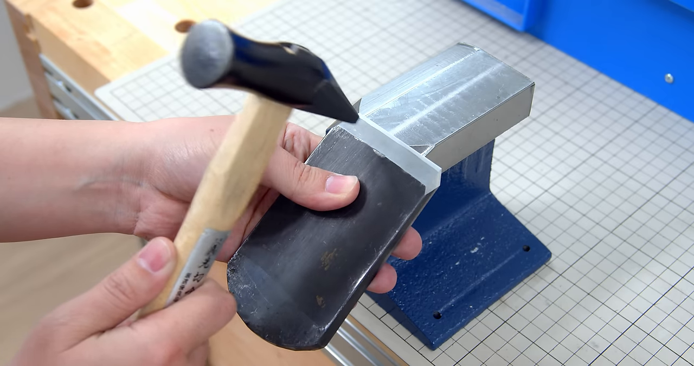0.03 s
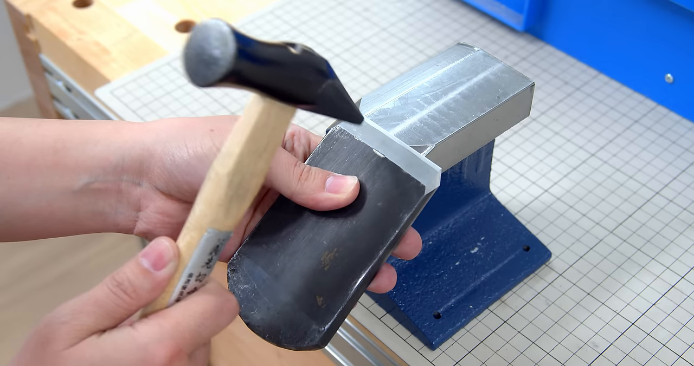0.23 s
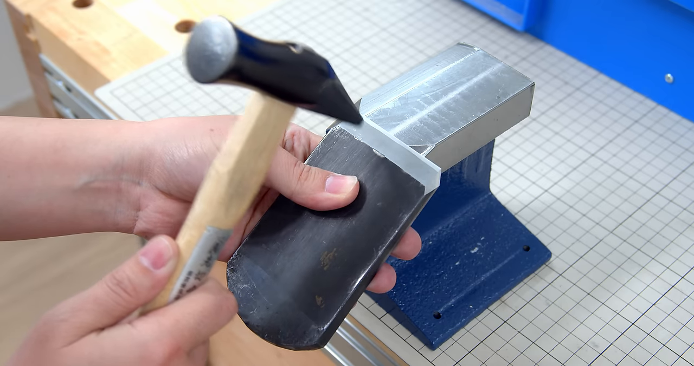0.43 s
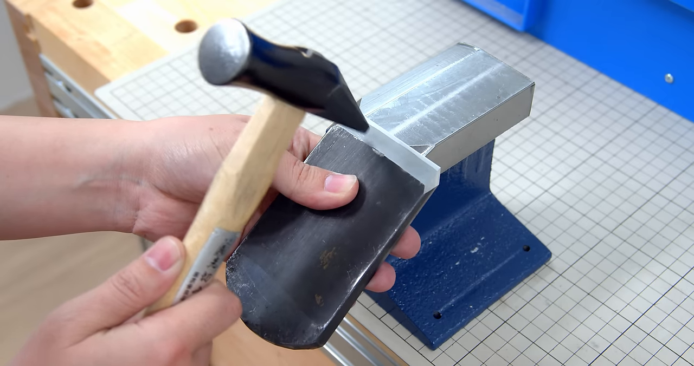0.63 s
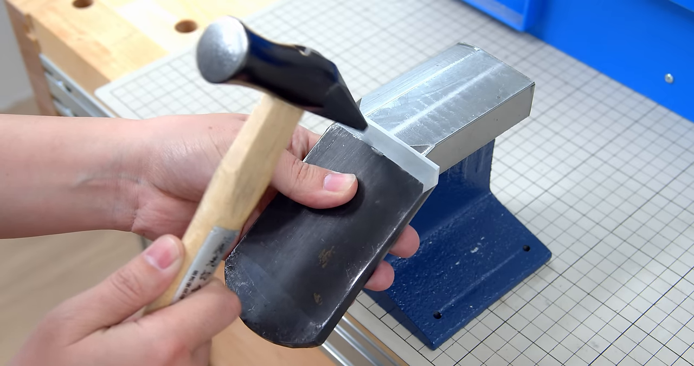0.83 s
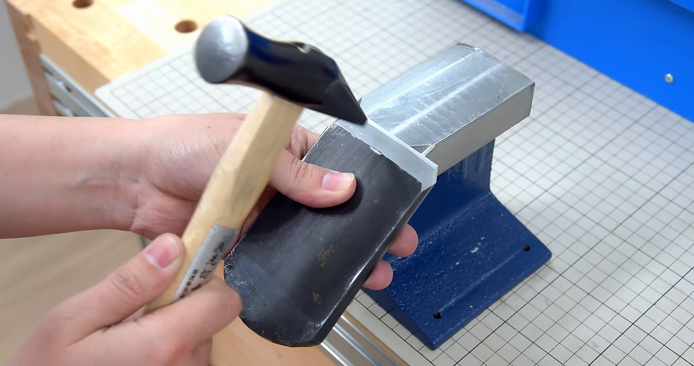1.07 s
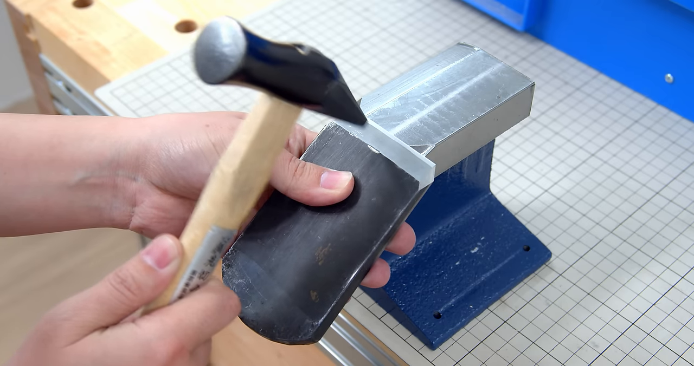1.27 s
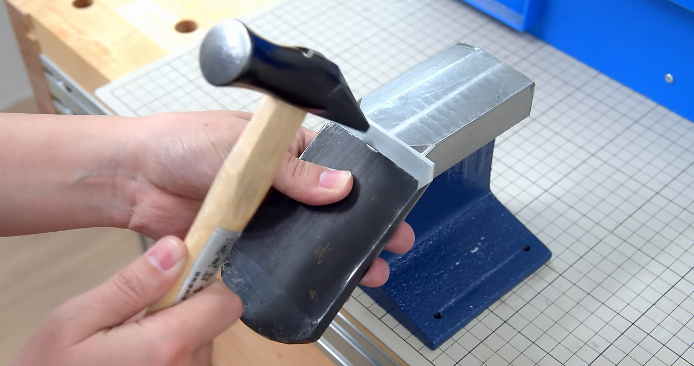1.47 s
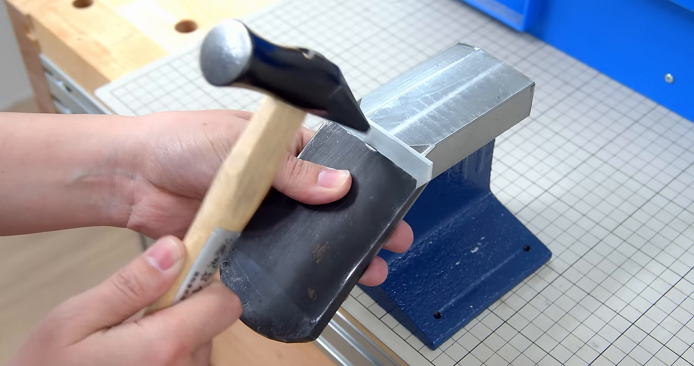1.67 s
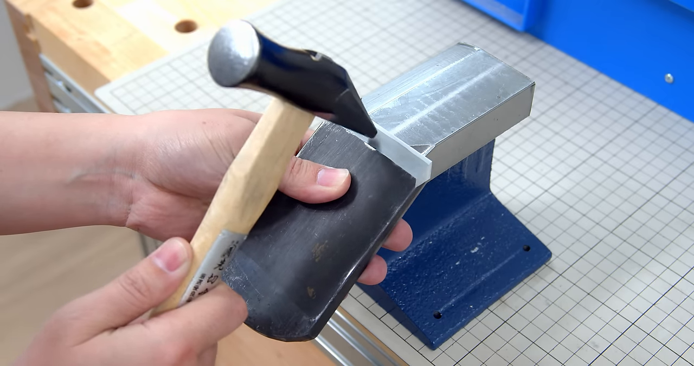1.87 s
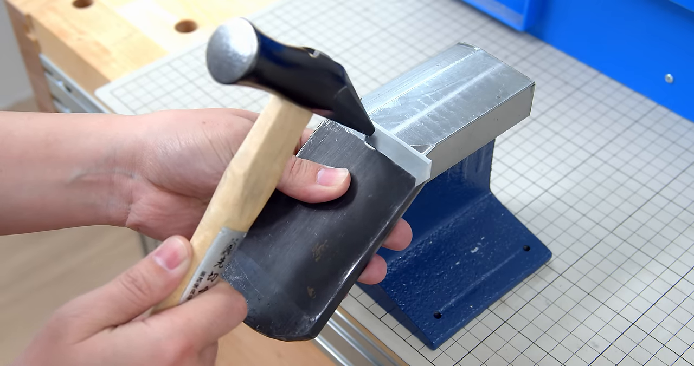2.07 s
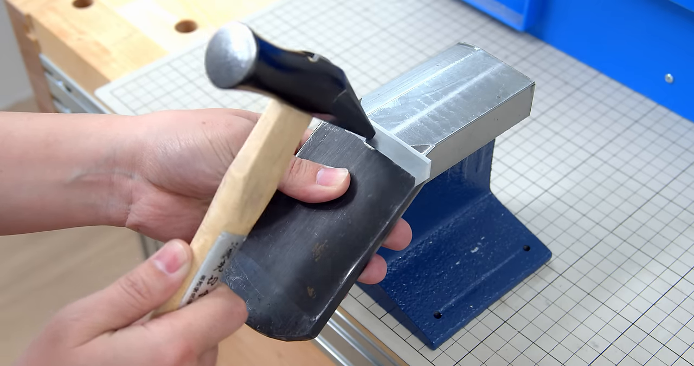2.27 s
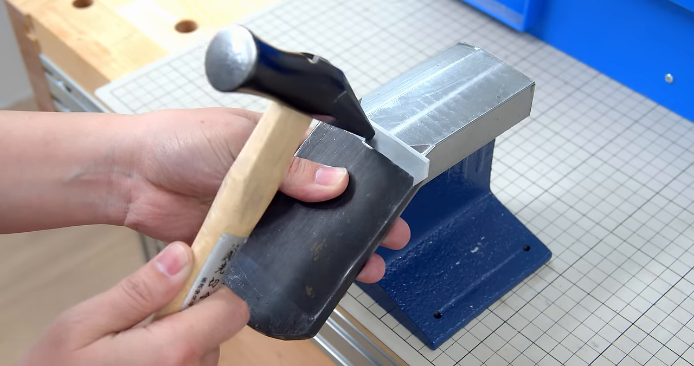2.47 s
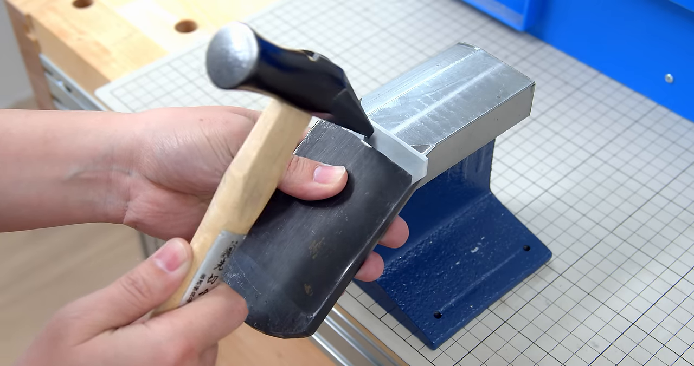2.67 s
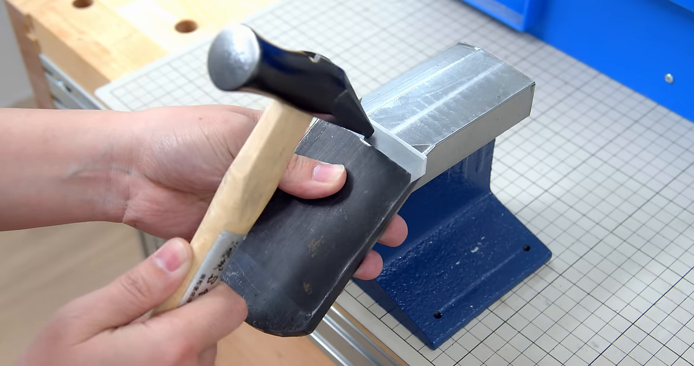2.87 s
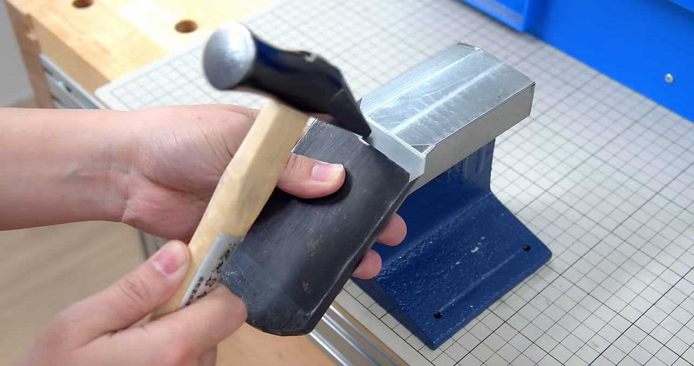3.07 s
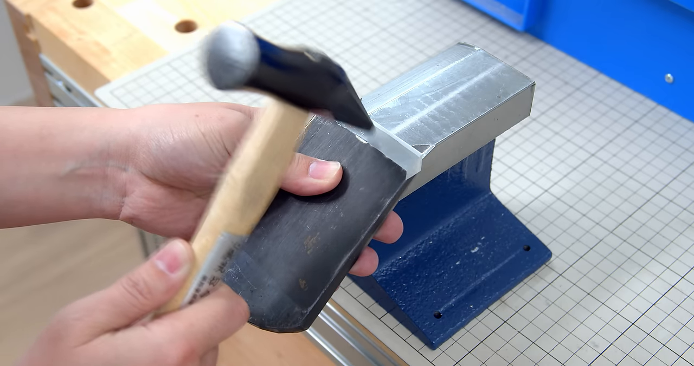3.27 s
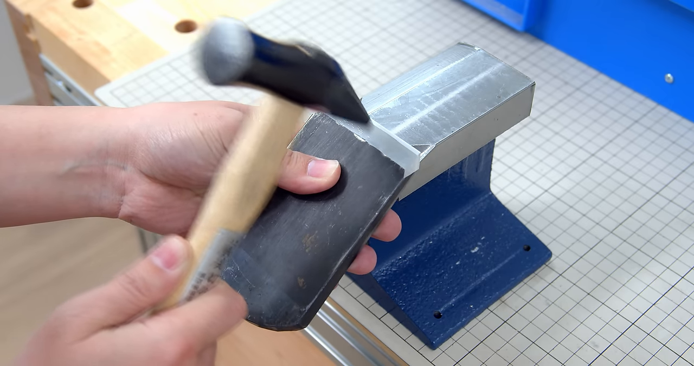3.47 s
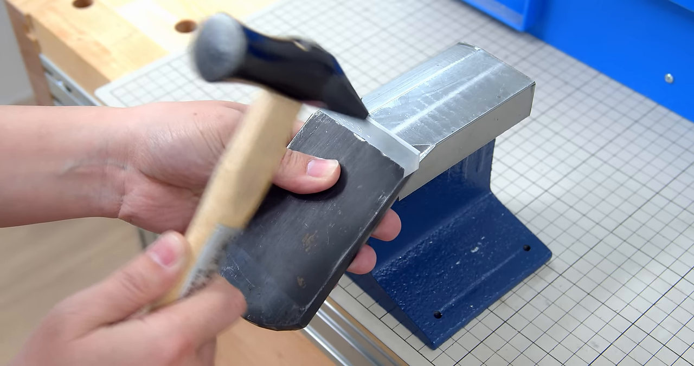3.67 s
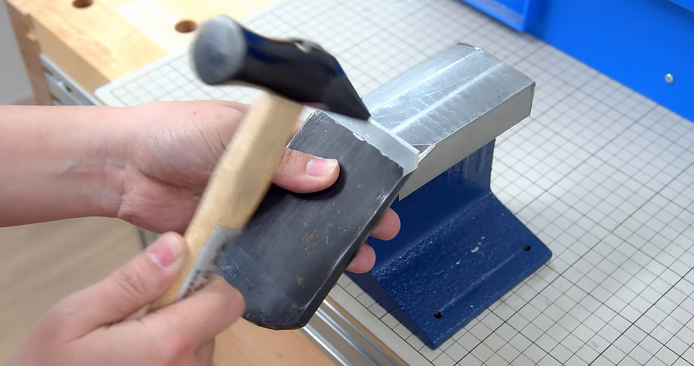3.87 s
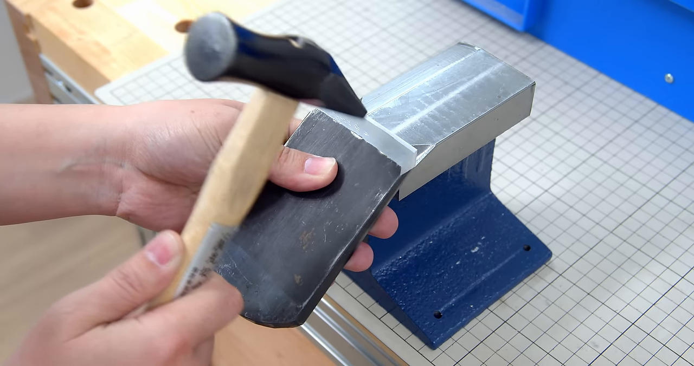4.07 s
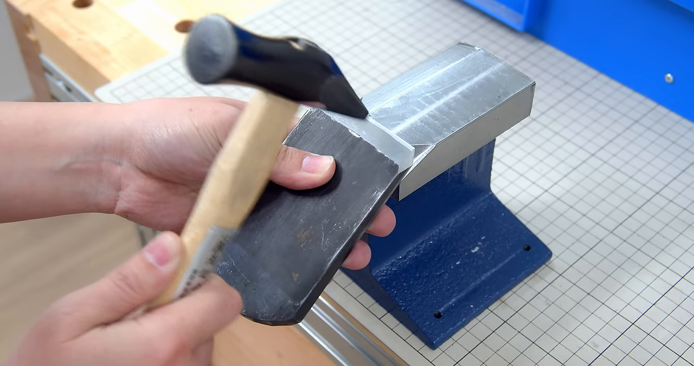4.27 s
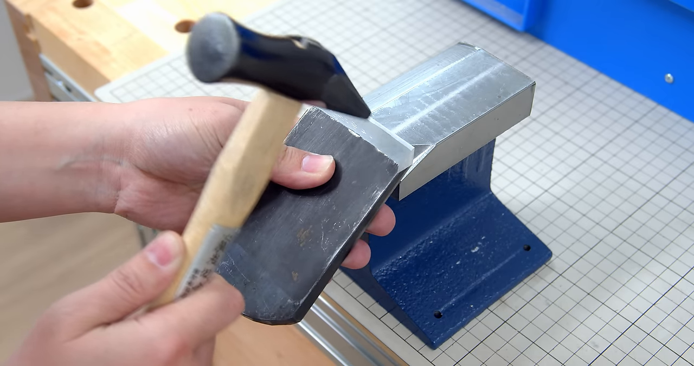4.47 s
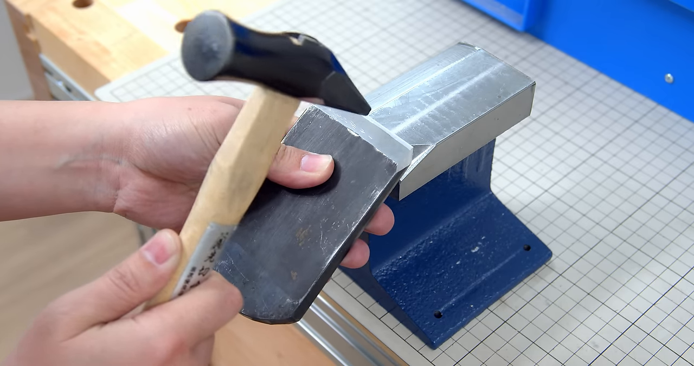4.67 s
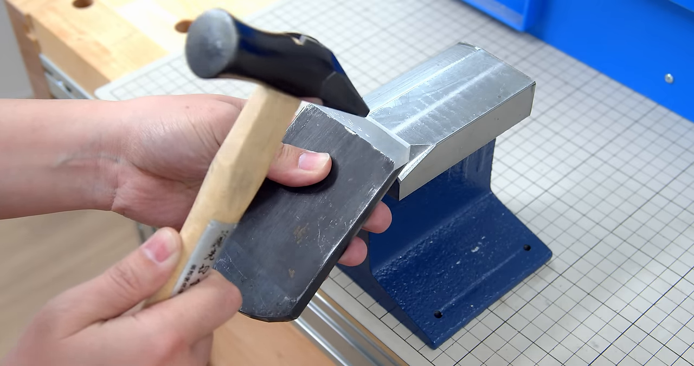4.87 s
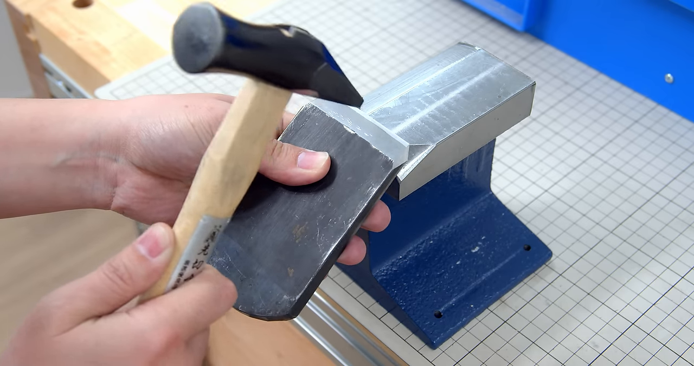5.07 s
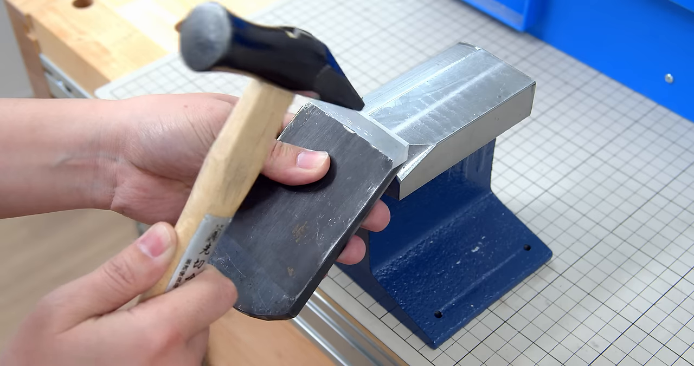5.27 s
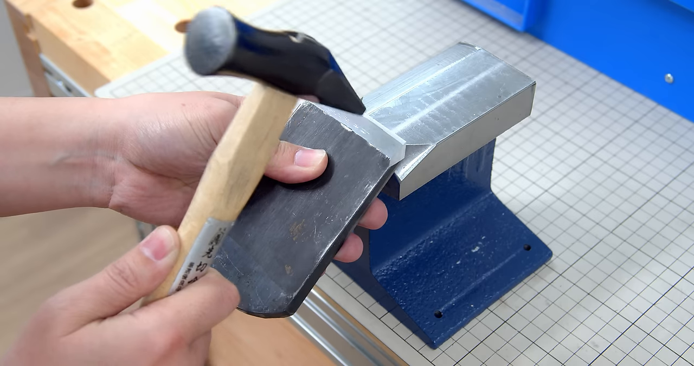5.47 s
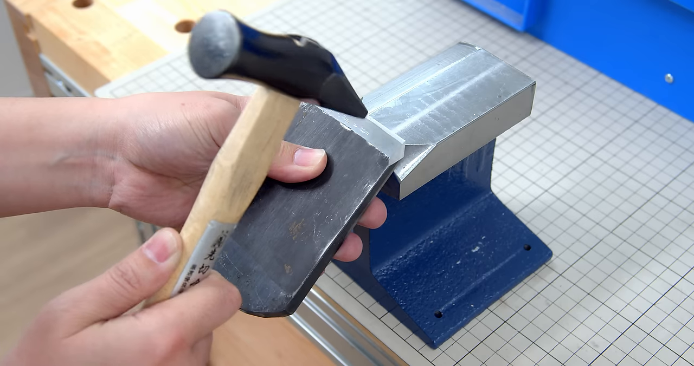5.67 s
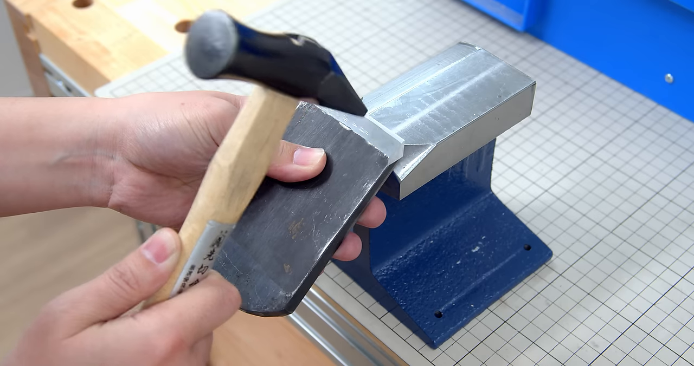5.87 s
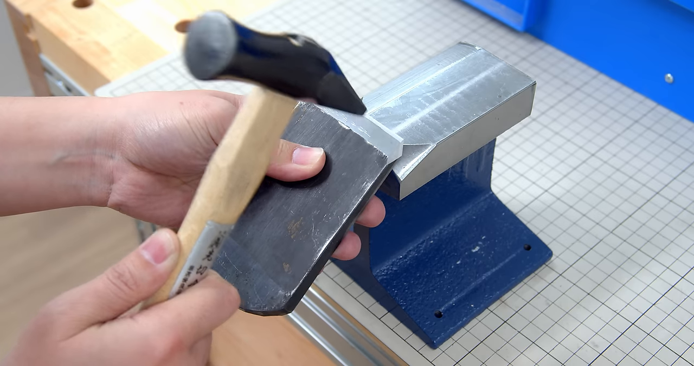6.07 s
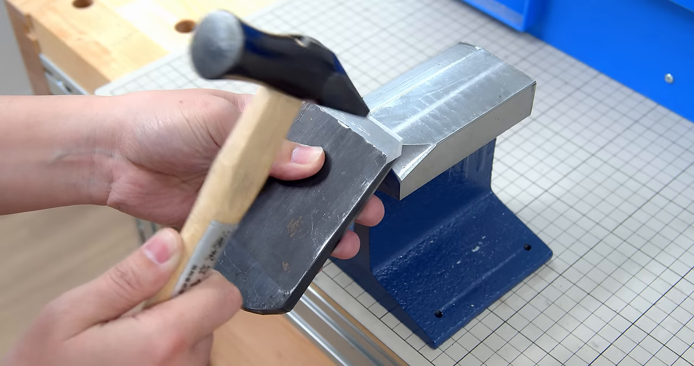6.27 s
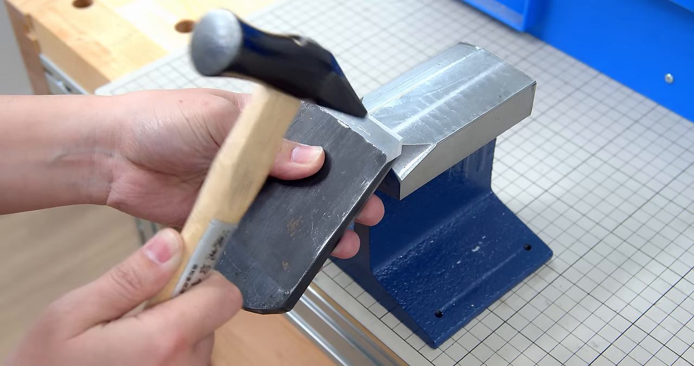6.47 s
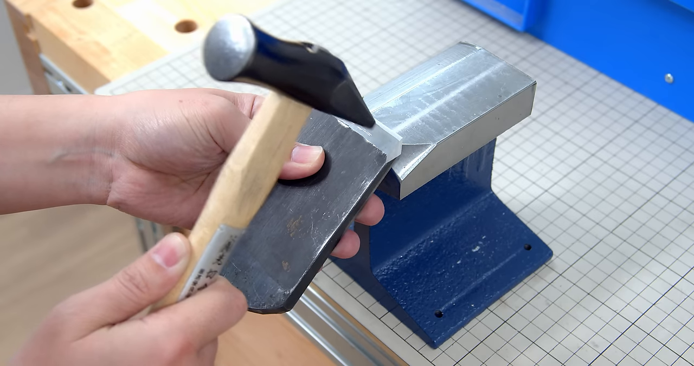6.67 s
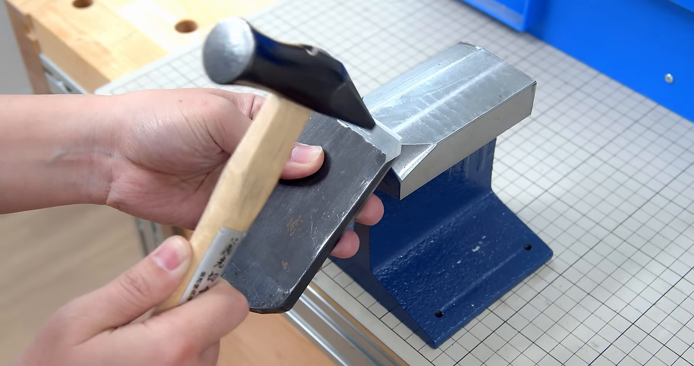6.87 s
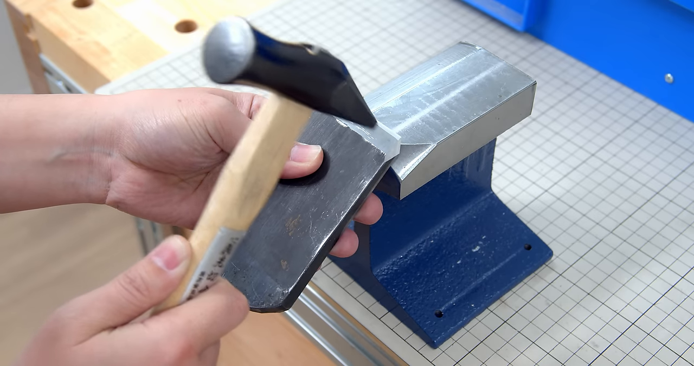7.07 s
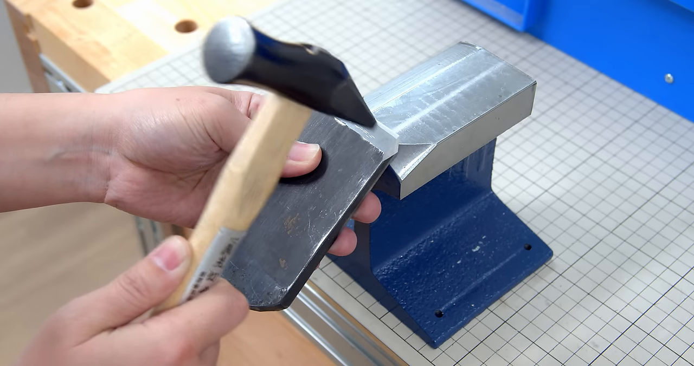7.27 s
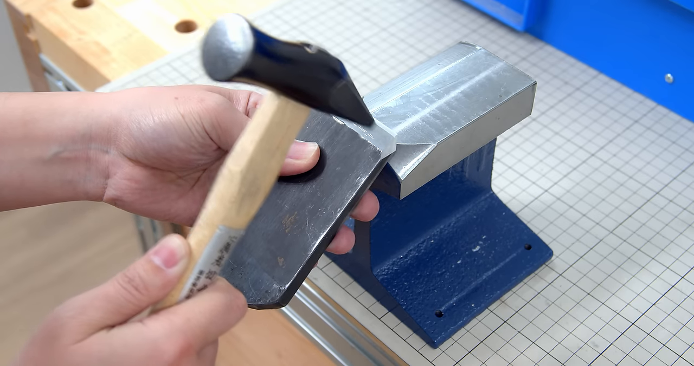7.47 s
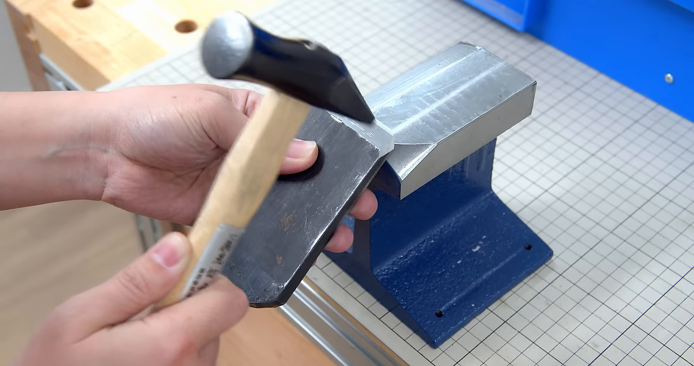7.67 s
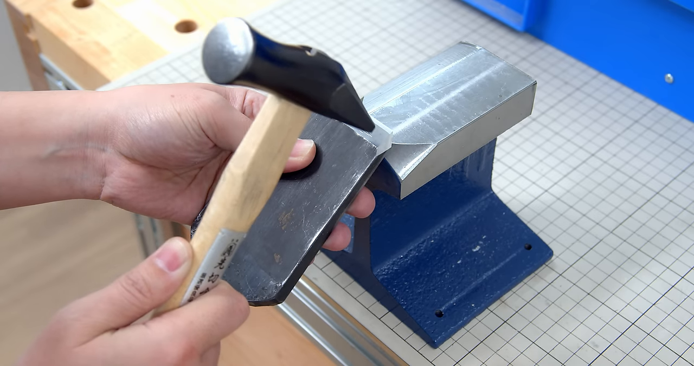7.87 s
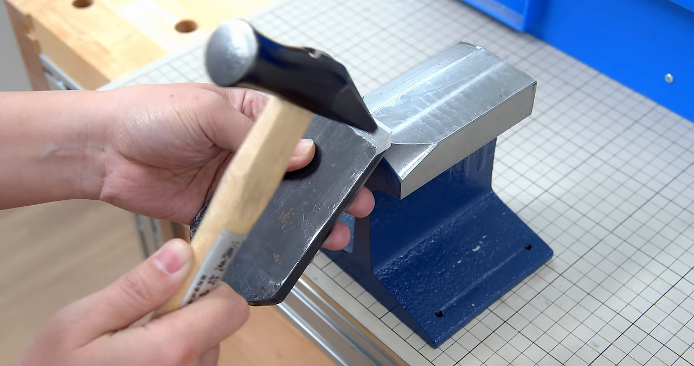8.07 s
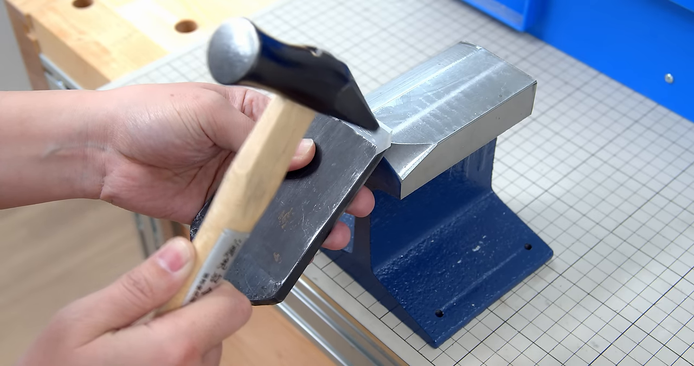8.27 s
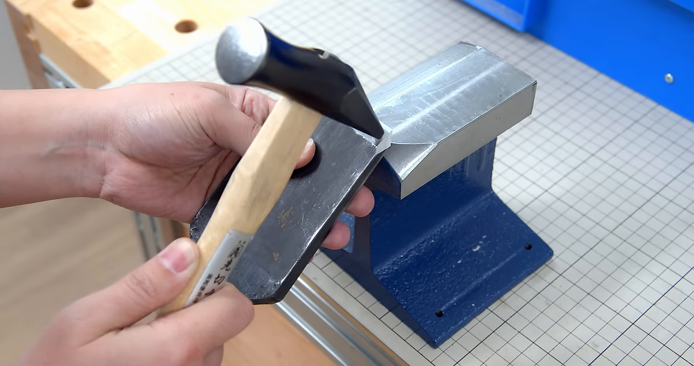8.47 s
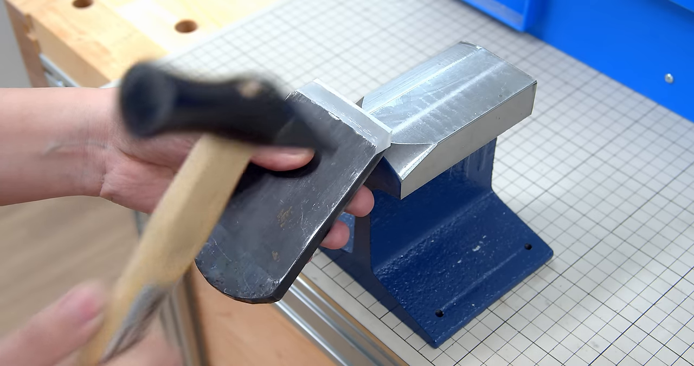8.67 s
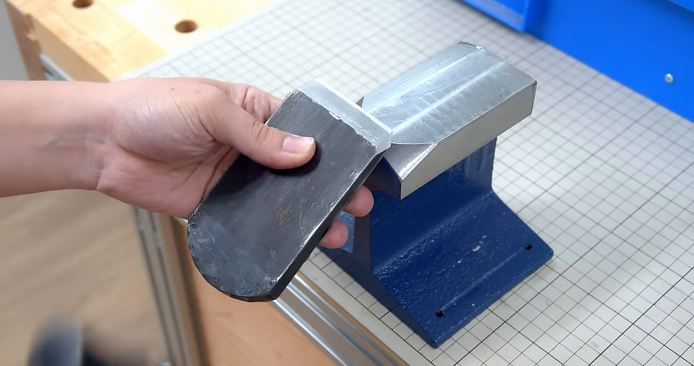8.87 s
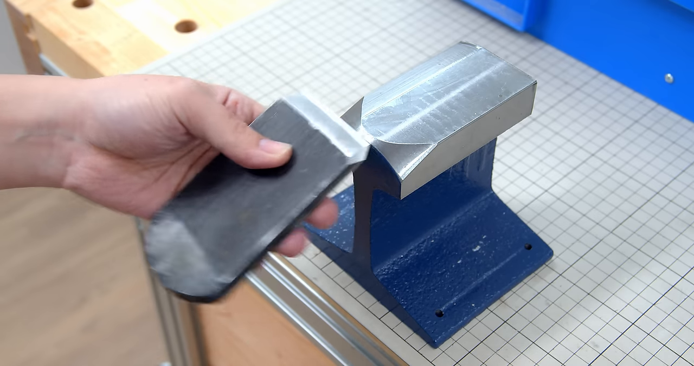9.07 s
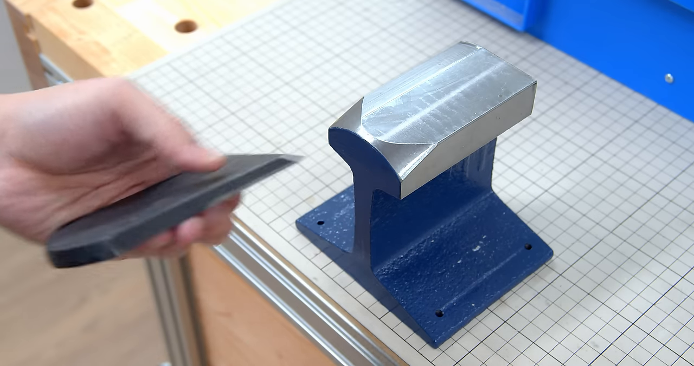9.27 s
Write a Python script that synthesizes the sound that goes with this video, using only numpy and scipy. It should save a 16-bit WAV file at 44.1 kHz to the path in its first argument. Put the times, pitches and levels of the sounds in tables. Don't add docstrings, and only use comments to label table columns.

```python
import sys
import numpy as np
from scipy import signal
from scipy.fft import rfft, irfft
from scipy.io import wavfile
from scipy.ndimage import uniform_filter1d, minimum_filter1d

SR = 44100
rng = np.random.default_rng(int(sys.argv[2]) if len(sys.argv) > 2 else 0)


def materialize(psi):
    bounded = np.clip(np.atleast_2d(psi).T, -1, 1)
    quanta = np.round(bounded * 32767).astype(np.int16)
    wavfile.write(sys.argv[1], SR, quanta)


def voltage_ratio(level):
    return 10 ** (np.asarray(level, float) / 20)


N = 411453
LEAD = SR // 10
DUCK_DB = -13

# (time [s], level [dB], spot along the edge [mm], distance in from the edge [mm])
TAPS_NEAR = [(-0.03, -11.5, 8.8, -0.66), (0.1832, -11.5, 6.2, -0.74), (0.4014, -11, 6.3, -0.68),
             (0.6212, -9.5, 6.23, -0.35), (0.8307, -11, 6.7, -1.1), (1.0364, -11, 6.46, -0.59),
             (1.2478, -11.5, 8.26, 0.094), (1.466, -10, 6.4, -0.93), (1.6697, -11.0, 8.54, 0.24),
             (1.8777, -10, 9, 0.34), (2.0967, -11, 8.9, -0.34), (2.298, -10.5, 9.16, 1),
             (2.5122, -10.5, 9.3, 0.64), (2.7223, -11.0, 10.2, 0.69), (2.9207, -11.0, 10.8, 0.49),
             (3.1386, -9.5, 10.3, 0.17), (3.3536, -10.5, 10.5, 0.77), (3.5577, -9.5, 12.8, 1),
             (3.7661, -9.5, 10.56, 0.015), (3.9723, -10.5, 10.85, 0.46), (4.1767, -9, 11.9, -0.34)]
TAPS_FAR = [(4.38, -8.5, 12.7, 1.05), (4.5823, -9.5, 12.8, 1.54), (4.7987, -8.5, 12.9, 1),
            (5.002, -9, 14.2, 1.23), (5.209, -8, 13.94, 1.46), (5.414, -9.5, 13.2, 0.77),
            (5.6154, -9, 14.43, 1.76), (5.8083, -9.5, 14.37, 2), (6.015, -9, 14.8, 1),
            (6.2199, -8.5, 15.33, 1), (6.4305, -7, 15, 1.6), (6.6362, -8, 14.94, 1.5),
            (6.8416, -10, 14.95, 1.5), (7.039, -11, 16.6, 0.35), (7.2457, -9.5, 17.3, 0.46),
            (7.449, -9, 18.2, 0.46), (7.65, -9, 18.2, 0.31), (7.8533, -9, 18, .3), (8.05, -11, 19.7, -0.7),
            (8.2514, -9.5, 18.2, -.5), (8.4545, -9, 18.3, -.3)]
BLOWS = TAPS_NEAR + TAPS_FAR


def filtered(x, design):
    return signal.sosfilt(design, x)


def bandpass(lo_hz, hi_hz):
    return signal.butter(2, [lo_hz, hi_hz], "bandpass", fs=SR, output="sos")


def noise_band(lo_hz, hi_hz):
    x = filtered(rng.standard_normal(N + LEAD), bandpass(lo_hz, hi_hz))
    return x / np.std(x)


def on_log(hz, table, column):
    points = np.array(table)
    return np.interp(np.log(hz + 1), np.log(points[:, 0]), points[:, column])


def colour(x, table):
    gain = voltage_ratio(on_log(np.fft.rfftfreq(1024, 1 / SR), table, column=1))
    cepstrum = irfft(np.log(gain))
    cepstrum[1:512] *= 2
    cepstrum[513:] = 0
    response = irfft(np.exp(rfft(cepstrum)))
    return signal.fftconvolve(x, response)[:len(x)]


def ring(hz, t60, seconds):
    t = np.arange(int(seconds * SR))[:, None] / SR
    return np.sin(2 * np.pi * hz * t) * np.exp(-np.log(1000) * t / t60)


def add(out, s, sound):
    i = int(round(s * SR)) + LEAD
    out[i:i + len(sound)] += sound[:len(out) - i]


def room_noise():
    # (frequency [Hz], level [dB per Hz])
    hiss_tone = [(180, -28.5), (340, -11.5), (560, -3), (1000, -6.5), (1500, -9), (4000, -16.5),
                 (9800, -24.5), (12000, -29), (16000, -27.5)]
    hiss = colour(rng.standard_normal(N + LEAD), hiss_tone)
    hiss = filtered(hiss, signal.ellip(8, .2, 60, 15750, fs=SR, output="sos"))
    return voltage_ratio(-58.5) * hiss / np.std(hiss) + voltage_ratio(-55) * noise_band(30, 43)


def movement():
    # (time [s], low rumble swell [dB], rustle swell [dB], length [s])
    moves = [
        (8.655, 7, 14, 0.11),
        (8.948, 4.5, -3, 0.042),
        (9.2, 4.5, -4, 0.031),
        (9.318, 5, -8, 0.044),
    ]
    s, rumble_swell_db, rustle_swell_db, length = np.transpose(moves)
    t = (np.arange(N + LEAD) - LEAD) / SR
    swell = np.exp(-((t[:, None] - s) / length) ** 2)
    rumble = voltage_ratio(-51.5 + swell @ rumble_swell_db) * noise_band(58, 99)
    rustle = voltage_ratio(-58 + swell @ rustle_swell_db) * noise_band(150, 380)
    return rumble + rustle


def knocks():
    # (time [s], level [dB], frequency [Hz], t60 [s])
    touches = [
        (8.758, -50, 500, .03),
        (8.985, -43, 520, .04),
        (9.203, -58, 6500, .006),
        (9.231, -50, 6000, .009),
    ]
    out = np.zeros(N + LEAD)
    grit = rng.standard_normal((len(touches), 3000))
    for (s, db, hz, t60), g in zip(touches, grit):
        burst = filtered(g, bandpass(hz * 0.5, hz * 1.2))
        fade = voltage_ratio(db - 60 * np.arange(len(g)) / SR / t60)
        add(out, s, fade * burst / np.std(burst))
    return out


def echoes(hz):
    # (frequency [Hz], t60 [s])
    decay = [(90, 0.2), (300, 0.45), (900, 0.29), (1500, 0.28), (3200, 0.33), (5500, 0.27), (8000, 0.25),
             (15000, 0.14)]
    t = np.arange(SR // 2) / SR
    tail = filtered(rng.standard_normal(len(t)), bandpass(hz / 2 ** .25, hz * 2 ** .25))
    tail *= voltage_ratio(-60 * t / on_log(hz, decay, column=1))
    return tail * np.clip((t - .003) / 0.0017, 0, 1)


def walls(x):
    bands = 70 * 2 ** np.arange(0, 8, .5)
    steady_top_hz = 800
    echo_turn_mm = 9
    s, _, along_mm, _ = np.transpose(BLOWS)
    spot_mm = np.interp((np.arange(len(x)) - LEAD) / SR, s, along_mm)
    turn = np.pi * spot_mm / echo_turn_mm
    treble = bands[bands > steady_top_hz]
    bass_tail = sum(echoes(hz) for hz in bands[bands < steady_top_hz])
    here = sum(echoes(hz) for hz in treble)
    there = sum(echoes(hz) for hz in treble)
    paths = (x, bass_tail), (x * np.cos(turn), here), (x * np.sin(turn), there)
    return sum(signal.fftconvolve(*path)[:len(x)] for path in paths)


def bench():
    # (frequency [Hz], level re blow [dB], t60 [s], polarity [+1 or -1])
    bench_modes = [(80, -25, 0.2, -1), (127.5, -10.1, 0.08, 1), (168.5, -26.6, 0.361, 1),
                   (196.1, -30.4, 0.305, 1), (226.6, -16.7, 0.211, -1), (249.6, -3.6, 0.076, -1),
                   (266.5, -17.3, 0.19, -1), (299.0, -31.8, 0.6, 1), (311.5, -21.0, 0.26, -1),
                   (355.9, -7.6, 0.094, -1), (391.5, -16.3, 0.179, -1), (450.5, -6.1, 0.074, -1),
                   (453.0, -4.6, 0.092, 1), (494.4, -3.9, 0.048, 1), (525.7, -22, 0.24, 1),
                   (554.7, -11, 0.119, 1), (590.7, -4.4, 0.053, 1), (627.9, -41.8, 0.6, -1),
                   (663.7, -30.4, 0.367, -1), (690.4, -11.0, 0.038, -1), (778.4, -24, 0.108, -1),
                   (862.9, -30, 0.2, -1), (905, -21, 0.06, 1), (1040, -17, 0.022, -1),
                   (1336.7, -3.6, 0.014, 1), (1466.9, -7.7, 0.013, 1), (1853.3, -11.4, 0.022, -1),
                   (1954.7, 3.5, 0.014, -1), (2151.2, -2.9, 0.012, 1)]
    rise_s = .004
    hz, db, t60, polarity = np.transpose(bench_modes)
    thump = ring(hz, t60, 0.6) @ (polarity * voltage_ratio(db))
    thump *= 1 - np.exp(-np.arange(len(thump)) / SR / rise_s)
    out = np.zeros(N + LEAD)
    for s, blow_db, *_ in BLOWS:
        add(out, s, voltage_ratio(blow_db) * thump)
    return out


def struck(along_mm, in_mm):
    # (mean level re blow [dB], swing [dB],
    # distance between loud spots [mm], a loud spot [mm], slope in from the edge [dB per mm])
    shapes = [
        (-16.5, 14.5, 48.6, 2.1, 5.5),
        (-17.5, 13, 11.74, 6.0, 10),
        (-13, 5, 16.6, 7.5, 4.1),
        (-16.5, 14.5, 4.11, 5.5, -3.5),
        (-21.5, 12, 26.5, 8, 3.3),
        (-61.5, 12.5, 9.32, 6.5, 2),
        (-48, 7.1, 14.8, 9, 3.5),
    ]
    upper_shapes = [
        (-3.4, 5.9, 20, 16.8, 1),
        (0, 2.5, 7, 12.5, 0.17),
        (-1, 5, 18, 11, 0.17),
    ]
    mean_db, swing_db, apart_mm, loud_mm, db_per_mm = np.transpose(shapes + upper_shapes)
    spots = np.cos(2 * np.pi * (along_mm - loud_mm) / apart_mm)
    return mean_db + swing_db * spots + db_per_mm * in_mm


def contact_grit():
    grit = rng.standard_normal((len(BLOWS), 512))
    grit = filtered(grit, signal.butter(2, 3000, "highpass", fs=SR, output="sos"))
    grit = uniform_filter1d(grit, size=4, axis=0) * 2
    t = np.arange(512) / SR
    return grit * np.exp(-t / 0.0014) * np.minimum(t / 0.00035, 1)


def steel():
    # (level re its ring [dB], t60 [s]); frequency [Hz]; ring number
    blade = [(-23, .03), (-16, 0.035), (-12.5, 0.065), (29.5, 0.034), (-18.5, 0.11), (-11, 0.046),
             (-10.5, 0.011), (1, 0.011), (-2, 0.017), (-10.5, 0.026), (-25.5, 0.017), (-23.5, 0.027),
             (-0.5, 0.034), (-3, 0.0038), (-2.5, 0.052), (-10, .04), (3, 0.018), (-19.5, 0.019),
             (-16.5, 0.016)]
    blade_hz = [2610, 2740, 2976, 3229, 3420, 3682, 4250, 4540, 4731, 4920, 5377, 5883, 7181, 7250, 7924,
                7800, 11051, 12688, 14201]
    blade_ring = [0, 0, 0, 7, 0, 0, 4, 4, 4, 4, 4, 4, 1, 1, 2, 2, 3, 9, 10]
    # (level re its ring [dB], t60 [s]); frequency [Hz]; ring number
    anvil = [(-40, 0.27), (6, .3), (4, 0.23), (-31.5, 0.096), (-41.5, 0.26), (-34.5, 0.18), (-35, 0.39),
             (19, 0.33), (-61.5, 0.46), (-49.5, 0.24), (-45, 0.15), (-47.5, .2), (-55, .32)]
    anvil_hz = [3133, 3240, 3353, 5733, 6174, 7240, 7929, 11132, 11364, 13156, 13253, 13420, 15310]
    anvil_ring = [8, 7, 7, 8, 8, 1, 2, 5, 8, 6, 8, 6, 8]
    # (time [s], extra level [dB])
    square = [
        (2.298, 5),
        (2.7223, 1.5),
        (3.3536, 5.5),
        (4.5824, 3),
        (6.4306, 6.5),
        (8.4545, 3.5),
    ]
    blade_db, blade_t60 = np.transpose(blade)
    anvil_db, anvil_t60 = np.transpose(anvil)
    anvil_lines = ring(np.array(anvil_hz), anvil_t60, 0.6)
    swing = np.minimum(np.arange(int(.15 * SR)) / SR / .0012, 1)
    click = 3.74 * (np.arange(512) == 20)
    chance = rng.standard_normal((len(BLOWS), 3, 32))
    rings, crack = np.zeros(N + LEAD), np.zeros(N + LEAD)
    for (s, blow_db, along_mm, in_mm), c, chatter in zip(BLOWS, chance, contact_grit()):
        *low_db, mid, head, linger, thin, high, top = struck(along_mm, in_mm)
        linger += sum(extra_db for at, extra_db in square if abs(at - s) < 1 / 20)
        level_db = blow_db + np.r_[low_db, mid + 6, head, 0, linger, thin, high, top]
        blade_chance = c[:, :len(blade_db)]
        hz = np.array(blade_hz) * (1 + .005 * blade_chance[1])
        mode_db = level_db[blade_ring] + blade_db + 0.89 * blade_chance[0]
        add(rings, s, swing * (ring(hz, blade_t60, .15) @ voltage_ratio(mode_db)))
        line_db = level_db[anvil_ring] + anvil_db + 3 * c[2, :len(anvil_db)]
        add(rings, s, anvil_lines @ voltage_ratio(line_db))
        add(crack, s, voltage_ratio(blow_db - 1.5) * (1.15 * click + 0.45 * chatter))
    return rings, crack


def scene():
    # (frequency [Hz], level [dB])
    crack_tone = [(500, -77.5), (900, -25), (1400, 0), (2000, -16.5), (2500, 3.5), (3200, 2), (3900, -3),
                  (4700, 2), (5300, 1), (6300, 1.5), (8500, -7), (10000, -3), (12000, -11.5), (14500, -11)]
    # (frequency [Hz], level [dB])
    spray_tone = [(60, 23.5), (160, 11.5), (400, 4.5), (750, 13.5), (1000, 4), (1600, 0.5), (2400, -4),
                  (3200, 1), (4000, -7), (5000, -3.5), (6600, -6.5), (10800, -16), (11800, -20),
                  (16000, -23)]
    walls_db = {"spray": -29.5, "rings": -41.5, "bench": -45}
    wood = bench()
    rings, crack = steel()
    sent = voltage_ratio(walls_db["spray"]) * colour(crack, spray_tone)
    sent += voltage_ratio(walls_db["rings"]) * rings + voltage_ratio(walls_db["bench"]) * wood
    taps = wood + rings + colour(crack, crack_tone) + walls(sent)
    background = room_noise() + movement() + knocks()
    return (voltage_ratio(-DUCK_DB) * taps + background)[None, LEAD:]


def band_limit(x):
    return signal.sosfilt(signal.butter(12, 16850, fs=SR, output="sos"), x)


def record(dry):
    hold_s, release_s = .15, .065
    soft_top = 1.3
    hold = int(hold_s * SR)
    quiet = minimum_filter1d((np.abs(dry[0]) < .4) * 1., hold, origin=(hold - 1) // 2)
    quiet[:hold] = 0
    quiet = minimum_filter1d(quiet, 400)
    last_loud = np.maximum.accumulate(np.where(quiet < 1, np.arange(N), 0))
    gain_db = DUCK_DB * np.exp(-(np.arange(N) - last_loud) / SR / release_s)
    mix = soft_top * np.tanh(dry * voltage_ratio(gain_db) / soft_top)
    mix = filtered(mix, signal.butter(6, 15200, fs=SR, output="sos"))
    mix = filtered(mix, signal.butter(2, 45, "highpass", fs=SR, output="sos"))
    mix = filtered(mix, signal.ellip(8, .2, 70, 16750, fs=SR, output="sos"))
    return band_limit(mix)


dry = scene()
out = record(dry)
materialize(out)
```